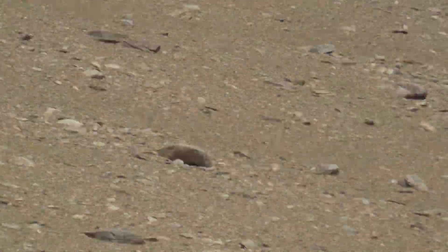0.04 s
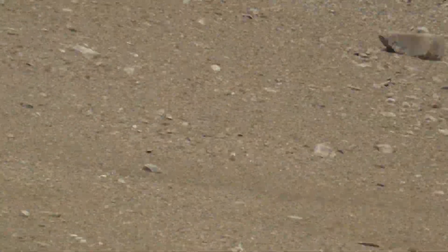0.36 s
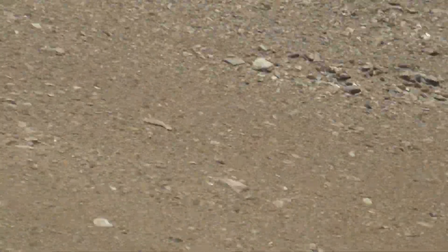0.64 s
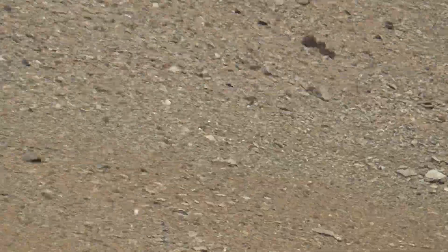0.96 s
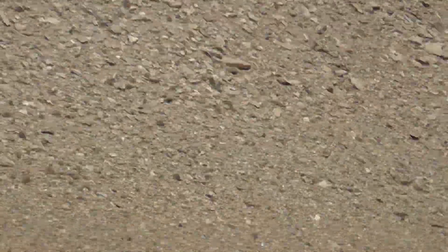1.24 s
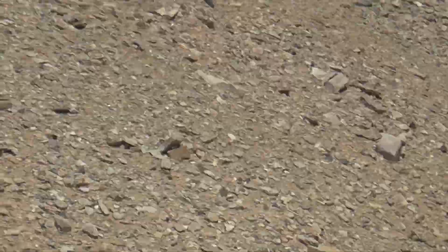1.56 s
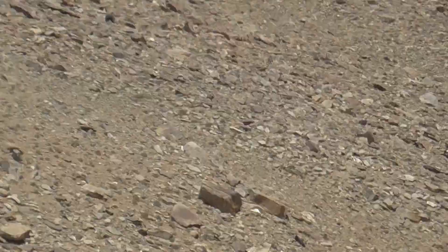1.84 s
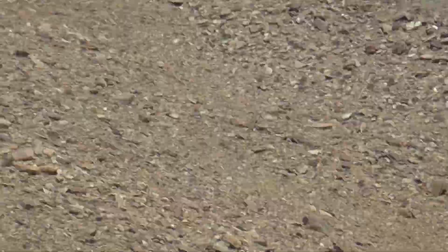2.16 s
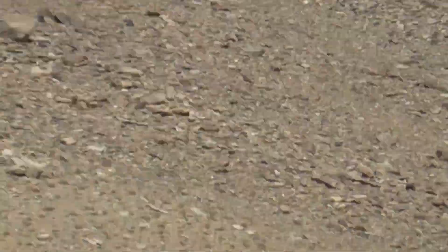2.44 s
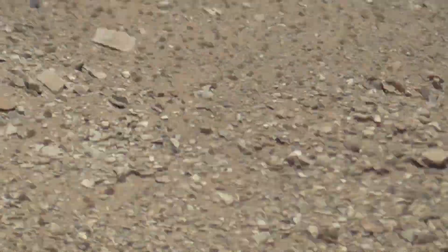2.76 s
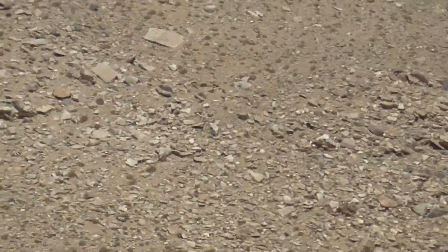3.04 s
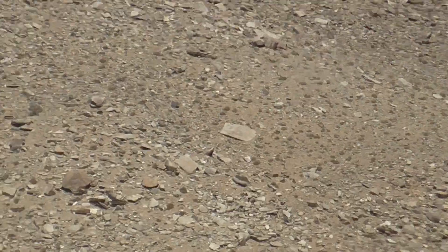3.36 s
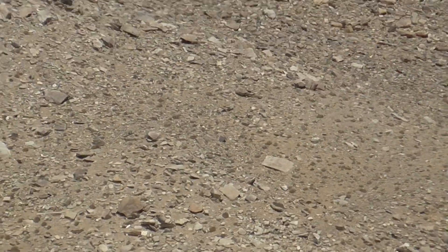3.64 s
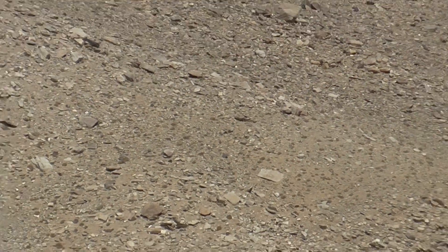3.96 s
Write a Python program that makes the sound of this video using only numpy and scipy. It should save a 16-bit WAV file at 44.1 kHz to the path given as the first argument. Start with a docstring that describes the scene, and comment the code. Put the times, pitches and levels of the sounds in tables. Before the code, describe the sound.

Low puffs of wind hit the microphone, growing stronger, over a distant idling engine.

```python
"""Idling engine in gusty wind

A four-cylinder engine idles some way off on open stony ground, each cylinder knocking in its own modes
over rumble, drone and hiss. Turbulence buffets the microphone in low puffs and pops that crowd together
and strengthen towards the end. Two faint rustles brush the camera, a thin high buzz runs throughout,
and the camera's gain control ducks under the hardest puffs."""
import sys
import numpy as np
from scipy.fft import rfft, irfft, next_fast_len
from scipy.io import wavfile
from scipy.ndimage import uniform_filter1d, minimum_filter1d, map_coordinates

SR = 44100
rng = np.random.default_rng(int(sys.argv[2]) if len(sys.argv) > 2 else 0)


def master(y):
    """Save y as 16-bit WAV."""
    cut = np.clip(np.atleast_2d(y).T, -1, 1)
    pcm = np.round(cut * 32767)  # scale
    wavfile.write(sys.argv[1], SR, pcm.astype(np.int16))


N = 176400
FIRING_HZ, FIRST_FIRING_S = 25.0, 0.017


def amp(db):
    """Amplitude ratio of a level in decibels."""
    return 10 ** (np.asarray(db) / 20)


def unit(x):
    """Normalisation to rms 1."""
    return x / np.sqrt(np.mean(x ** 2) + 1e-20)


def clock():
    """Sample times in seconds."""
    return np.arange(N) / SR


def wobble(knots_per_s):
    """Smooth random modulation: a spline through Gaussian values."""
    return map_coordinates(rng.standard_normal(4096), [clock() * knots_per_s], mode="wrap")


def filtered(x, response):
    """Linear filtering: the spectrum of x is multiplied by a frequency response."""
    size = next_fast_len(N + 8192)
    return irfft(rfft(x, size) * response(np.fft.rfftfreq(size, 1 / SR)), size)[:N]


def noise(spectrum):
    """Coloured noise of rms 1, its relative spectral density interpolated over log frequency."""
    frequency_hz, density_db = np.transpose(spectrum)
    white = rng.standard_normal(N)
    return unit(filtered(white, lambda hz: amp(np.interp(np.log(hz + 1), np.log(frequency_hz), density_db))))


def local_rms(x, window_s):
    """Running rms over a centred window."""
    return np.sqrt(np.abs(uniform_filter1d(x ** 2, max(int(window_s * SR), 1))) + 1e-12)


def turbulence(spectrum, eddy_s=0.01423):
    """Noise of rms 1, divided by its own envelope to stay even from eddy to eddy."""
    x = noise(spectrum)
    return unit(x / local_rms(x, eddy_s))


def resonance(centre_hz, width_hz):
    """Random excitation of one resonance: narrow-band noise of rms 1."""
    white = rng.standard_normal(N)
    return unit(filtered(white, lambda hz: 1 / (1 + 2 * ((hz - centre_hz) / width_hz) ** 2)))


def wind():
    """Turbulent pressure: each band grows as its own power of the wind, so hard puffs sound brighter."""
    # wind strength between the puffs: time_s, level_db
    lulls = [(0.0, -30.5), (0.3, -27), (0.45, -37), (0.9, -39), (1.18, -49), (1.3, -31), (1.6, -37.5),
             (1.95, -44.5), (2.3, -29), (2.58, -49.5), (2.75, -24), (3.1, -28), (3.3, -24.5), (3.55, -22),
             (3.78, -29), (4.0, -25.5)]
    # eddies striking the microphone: centre_s, length_s, level_db
    puffs = [(0.028, 0.045, -23), (0.102, 0.034, -22.5), (0.201, 0.015, -18), (0.276, 0.0059, -13),
             (0.495, 0.031, -28.5), (0.69, 0.032, -17), (0.781, 0.028, -21), (0.869, 0.022, -18),
             (0.959, 0.016, -18.5), (1.013, 0.04, -16), (1.085, 0.007, -21), (1.108, 0.021, -22.5),
             (1.23, 0.0062, -16), (1.257, 0.01, -19), (1.338, 0.008, -22), (1.372, 0.02, -28),
             (1.449, 0.015, -22.5), (1.554, 0.042, -27), (1.7, 0.051, -25), (1.809, 0.0054, -21.5),
             (2.074, 0.013, -17), (2.104, 0.048, -24.5), (2.179, 0.012, -16.5), (2.21, 0.0099, -12.5),
             (2.252, 0.017, -15), (2.298, 0.043, -21), (2.363, 0.024, -13.5), (2.428, 0.011, -19.5),
             (2.477, 0.013, -19), (2.516, 0.027, -12.5), (2.635, 0.022, -19.5), (2.68, 0.019, -19),
             (2.759, 0.037, -16), (2.87, 0.02, -14), (2.914, 0.0071, -11.5), (3.02, 0.0087, -17.5),
             (3.165, 0.021, -19.5), (3.206, 0.011, -12), (3.24, 0.037, -13.5), (3.279, 0.017, -10.5),
             (3.334, 0.012, -12), (3.394, 0.019, -11.5), (3.423, 0.0091, -7), (3.459, 0.015, -13),
             (3.507, 0.039, -15), (3.593, 0.038, -15), (3.651, 0.0072, -2.5), (3.694, 0.064, -9.5),
             (3.741, 0.016, -5), (3.831, 0.028, -9), (3.886, 0.022, -9), (3.92, 0.1, -14.5),
             (3.957, 0.0054, -4.5)]
    # spectra of buffeting, soft low body, pressure swell and rasp: frequency_hz, density_db
    buffet_spectrum = [(25, -21), (60, -9), (110, -5), (170, 1), (250, 2.5), (330, -5.5), (440, -14),
                       (700, -31.5), (1500, -49), (3000, -89)]
    body_spectrum = [(40, -17.5), (80, -5.5), (135, 1), (185, -0.5), (240, -11), (400, -39.5), (1000, -80)]
    swell_spectrum = [(12, -25), (25, -6), (42, 8), (80, 10), (160, 8), (400, -79.5)]
    rasp_spectrum = [(150, -32), (400, 9.5), (800, 6.5), (1500, -3), (3000, -26.5), (8000, -44),
                     (15000, -54.5)]
    flutter_db, ragged_db, reference_db = 5, 1.2, -20
    t = clock()
    breeze = amp(np.interp(t, *np.transpose(lulls)) + flutter_db * wobble(35))
    eddy_power = sum(amp(level_db) ** 2 * np.exp(-np.pi * ((t - centre_s) / length_s) ** 2)
                     for centre_s, length_s, level_db in puffs)
    eddy_power *= amp(ragged_db * wobble(90)) ** 2
    push = np.sqrt(breeze ** 2 + eddy_power) / amp(reference_db)  # incoherent parts add in power
    buffet = amp(-23) * push ** 1.16 * turbulence(buffet_spectrum)
    body = amp(-24) * push ** 0.64 * turbulence(body_spectrum)
    swell = amp(-35.5) * push ** 0.75 * noise(swell_spectrum)
    rasp = amp(-48.5) * push ** 1.203 * noise(rasp_spectrum)
    return buffet + body + swell + rasp


def engine():
    """Amplitude modulation: clatter, hiss and ticks pulse at each firing, over rumble and a drone."""
    # spectra of exhaust rumble, clatter, hiss and valve ticks: frequency_hz, density_db
    rumble_spectrum = [(15, -41), (30, -25.5), (50, 5.5), (115, 2.5), (200, -8.5), (300, -12.5), (420, -17),
                       (600, -11), (1200, -58.5)]
    clatter_spectrum = [(200, -11), (420, 2.5), (600, -0.5), (800, -2), (1100, -3.5), (1300, -5.5),
                        (1600, -7), (1900, -9), (2200, -18.5), (2600, -25.5), (2900, -27), (5000, -55.5)]
    hiss_spectrum = [(1500, -16), (2900, -6.5), (3600, -4.5), (4200, -1), (4900, -1.5), (5500, -3),
                     (6300, -8.5), (7200, -13), (10000, -15.5), (12600, -19.5), (15500, -20)]
    tick_spectrum = [(4000, -33), (6500, -6.5), (7800, 2), (9700, -4), (11000, -4.5), (15000, -27)]
    # faint metallic resonances in the hiss: centre_hz, width_hz, level_db
    rings = [(2505, 120, -71.5), (3563, 45, -79.5), (4217, 51, -74.5), (4870, 200, -68.5),
             (5425, 90, -71.5), (6400, 670, -72.5)]
    drone_hz, pulse_lag_s = 529.2, 0.011
    clatter_swing_db, hiss_swing_db, tick_swing_db = 1.06, 1, 4
    t = clock()
    pulse = np.cos(2 * np.pi * FIRING_HZ * (t - FIRST_FIRING_S - pulse_lag_s))
    clatter = amp(-44.5 + clatter_swing_db * pulse + 0.34 * wobble(14)) * noise(clatter_spectrum)
    metal = sum(amp(level_db) * resonance(hz, width_hz) for hz, width_hz, level_db in rings)
    hiss = amp(hiss_swing_db * pulse + 0.55 * wobble(7.4)) * (amp(-60) * noise(hiss_spectrum) + metal)
    ticks = amp(-76 + tick_swing_db * pulse) * noise(tick_spectrum)
    drone = amp(-49 + wobble(20)) * unit(np.sin(2 * np.pi * drone_hz * t + 0.8 * wobble(11)))
    rumble = amp(-36.5) * noise(rumble_spectrum)
    return rumble + drone + clatter + hiss + ticks


def buzz(gate_hz=50, peak_s=0.003):
    """Periodic gating of a narrow treble band: a thin buzz, probably the camera's electronics."""
    # spectrum of the band: frequency_hz, density_db
    spectrum = [(9000, -43.5), (10400, -12), (11000, -2.5), (11850, 2), (12300, -4.5), (13500, -40.5)]
    gate = np.sqrt(np.maximum(np.cos(2 * np.pi * gate_hz * (clock() - peak_s)), 0))
    return amp(-72) * gate * noise(spectrum)


def knocks(cylinders=4):
    """Impulse excitation: the cylinders fire in turn, each ringing its own damped modes of the engine."""
    # modes rung by each cylinder: firing_place, pitch_hz, relative_level_db
    modes = [(0, 952, -54.5), (0, 1118, -46.5), (0, 1881, -49.5), (0, 3250, -67.5), (1, 1112, -47.5),
             (1, 1443, -42), (1, 1575, -47.5), (2, 732, -40.5), (2, 1440, -46), (2, 1636, -46),
             (2, 1846, -52), (3, 976, -48.5), (3, 1137, -42)]
    rise_s, t60_s, scatter_db, roughness, gain_db = 0.0045, 0.069, 2.4, 0.17, 5.5
    t = np.arange(SR // 8) / SR
    envelope = (1 - np.exp(-(t / rise_s) ** 2)) * amp(-60 * t / t60_s)
    out = np.zeros(N)
    for place, pitch_hz, level_db in modes:
        blows = np.zeros(N + SR)
        first_s = FIRST_FIRING_S + round(place) / FIRING_HZ
        for start_s in np.arange(first_s, N / SR, cylinders / FIRING_HZ):
            phase = 2 * np.pi * (pitch_hz * t + rng.random())
            strength = amp(level_db - scatter_db * rng.normal())
            blows[round(start_s * SR):][:len(t)] += strength * envelope * np.sin(phase)
        out += blows[:N] * (1 + roughness * wobble(180))
    return amp(gain_db) * out


def burst(peak_s, rise_s, fall_s):
    """Transient envelope: exponential growth to 1, then exponential decay."""
    t = clock()
    return np.exp(-np.maximum((peak_s - t) / rise_s, (t - peak_s) / fall_s))


def pops(rise_s=0.00081, fall_s=0.0025):
    """Pressure transients: eddies break abruptly on the microphone port."""
    # breaking eddies: peak_s, level_db
    breaks = [(2.067, -24), (2.247, -26.5), (2.871, -20), (3.202, -26.5), (3.398, -23), (3.447, -24.5),
              (3.654, -11.5), (3.722, -16.5), (3.744, -15), (3.895, -22)]
    # spectrum of a pop: frequency_hz, density_db
    spectrum = [(100, -7), (200, -2), (480, 0), (750, -7.5), (1100, -15.5), (1600, -18), (2500, -38),
                (5000, -47), (15000, -59)]
    envelope = sum(amp(level_db) * burst(peak_s, rise_s, fall_s) for peak_s, level_db in breaks)
    return envelope * turbulence(spectrum)


def rustles(grain_db=2.2):
    """Friction noise: light brushes against the camera, made grainy by fast random modulation."""
    # brushing strokes: peak_s, rise_s, fall_s, level_db
    strokes = [(2.627, 0.012, .008, -44.5), (2.83, 0.022, 0.034, -49.5), (2.875, .008, 0.0091, -54)]
    # spectrum of the friction: frequency_hz, density_db
    spectrum = [(800, -18), (1400, 12), (2600, -9), (4200, 8), (6000, 0), (8000, 1.5), (11000, -8),
                (15000, -24)]
    envelope = sum(amp(level_db) * burst(peak_s, rise_s, fall_s)
                   for peak_s, rise_s, fall_s, level_db in strokes)
    return envelope * unit(noise(spectrum) * amp(grain_db * wobble(400)))


def scene():
    """Superposition of all sources at one microphone."""
    return (wind() + pops() + engine() + knocks() + rustles() + buzz())[None]


def record(dry):
    """Dynamic compression: gain ducks under hard buffeting and recovers slowly; limiter and low-pass."""
    threshold_db, duck_slope, window_s, release_s = -19, 0.5, 0.15, 1.5
    ceiling, limiter_samples, cutoff_hz = 0.99, 301, 15700
    x = dry[0]
    # delayed by half a window, so the gain responds to sound already past
    loudness = np.pad(local_rms(x, window_s), (int(window_s * SR / 2), 0), mode="edge")[:N]
    excess_db = np.maximum(20 * np.log10(loudness) - threshold_db, 0)
    release = np.exp(-clock() / release_s)
    held_db = np.maximum.accumulate(excess_db / release) * release  # peak hold with exponential decay
    ducked = x * amp(-duck_slope * held_db)
    safe_gain = ceiling / np.maximum(np.abs(ducked), ceiling)
    limiter_gain = uniform_filter1d(minimum_filter1d(safe_gain, limiter_samples), limiter_samples)
    return filtered(ducked * limiter_gain, lambda hz: hz < cutoff_hz)[None]


dry = scene()
out = record(dry)
master(out)
```